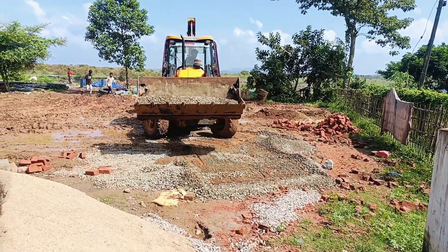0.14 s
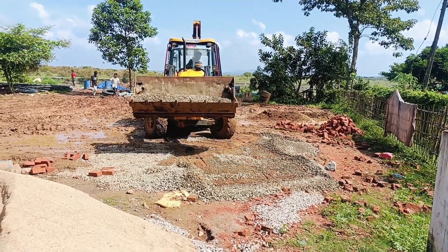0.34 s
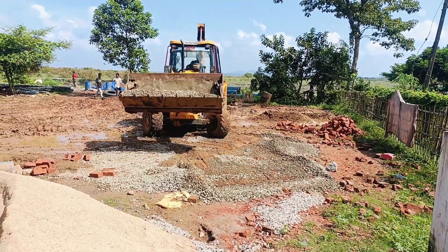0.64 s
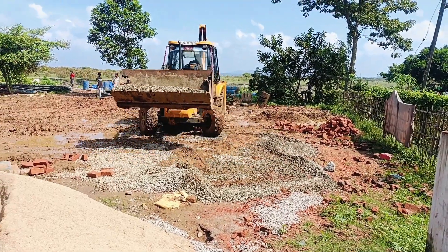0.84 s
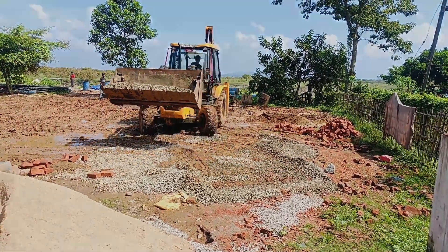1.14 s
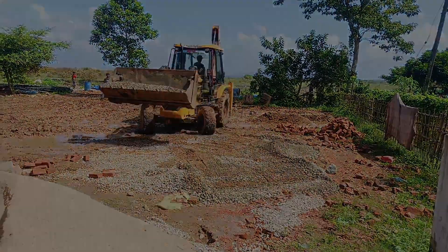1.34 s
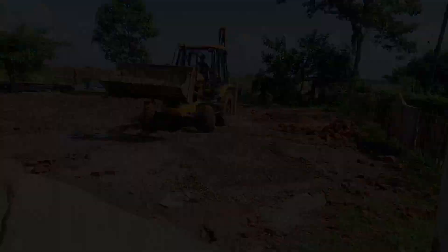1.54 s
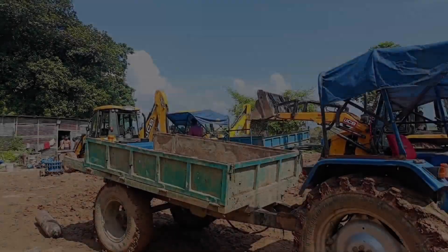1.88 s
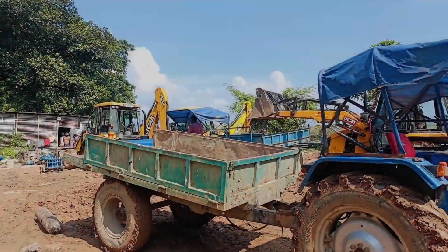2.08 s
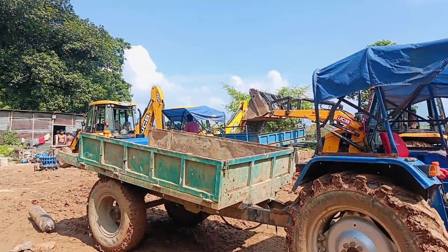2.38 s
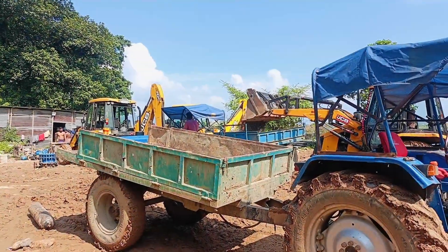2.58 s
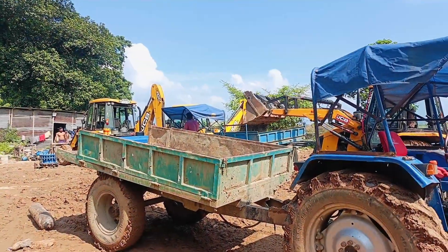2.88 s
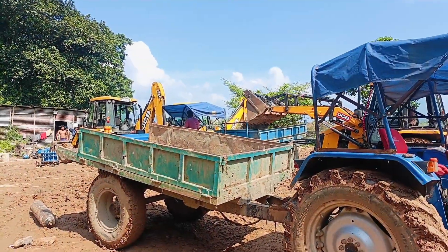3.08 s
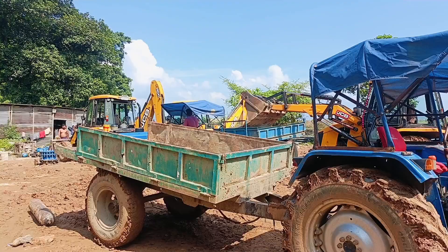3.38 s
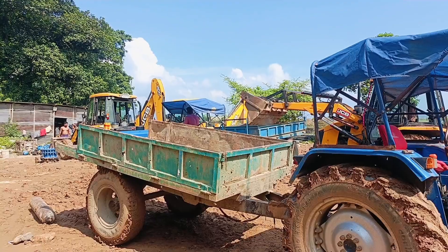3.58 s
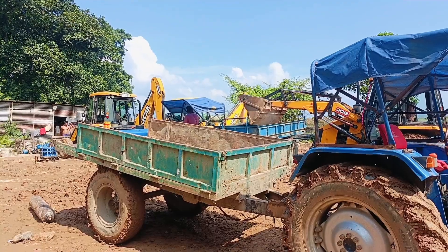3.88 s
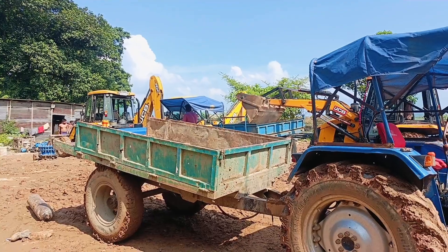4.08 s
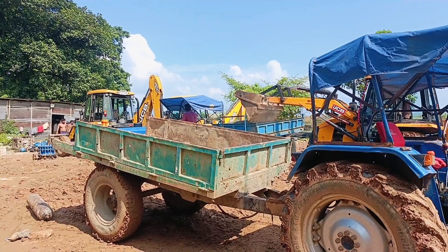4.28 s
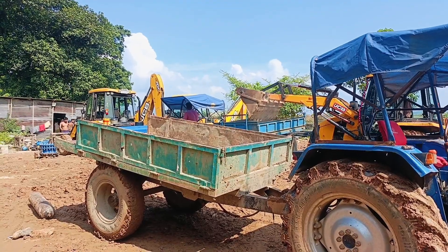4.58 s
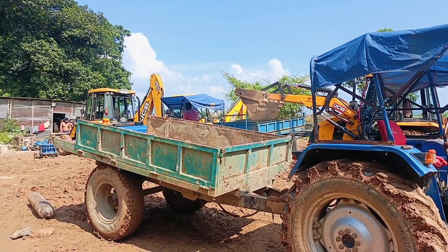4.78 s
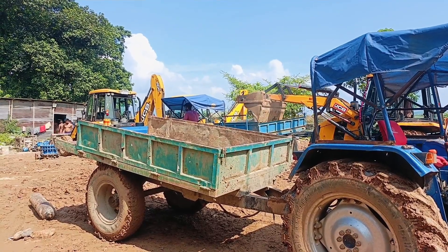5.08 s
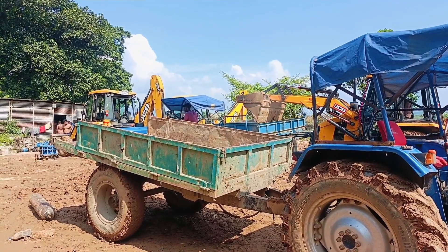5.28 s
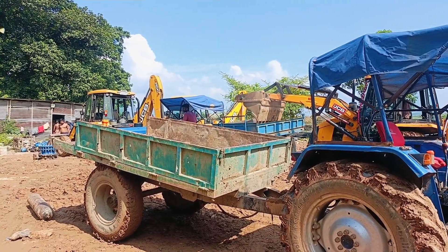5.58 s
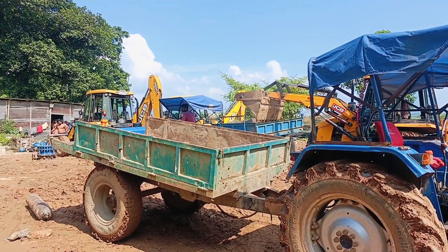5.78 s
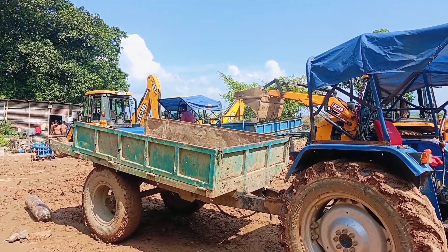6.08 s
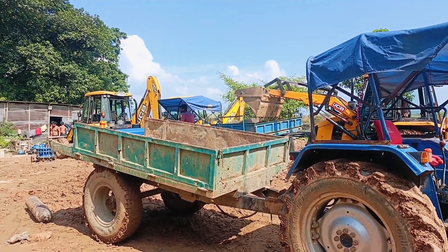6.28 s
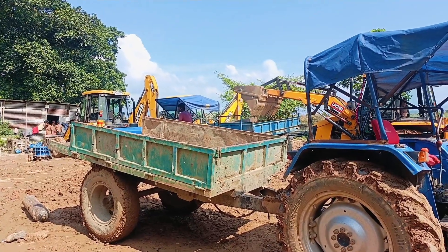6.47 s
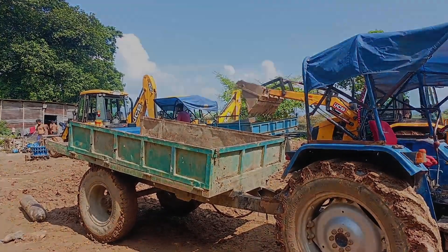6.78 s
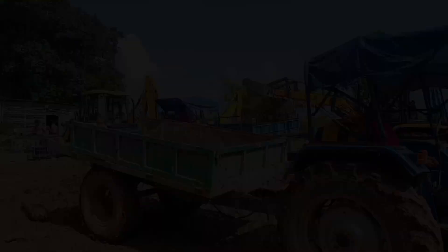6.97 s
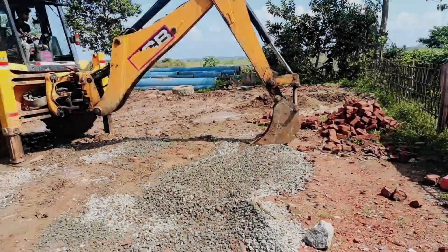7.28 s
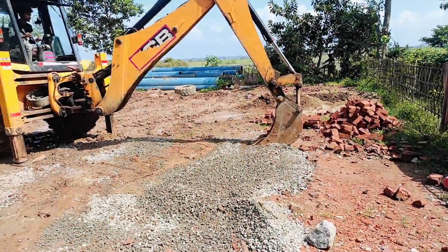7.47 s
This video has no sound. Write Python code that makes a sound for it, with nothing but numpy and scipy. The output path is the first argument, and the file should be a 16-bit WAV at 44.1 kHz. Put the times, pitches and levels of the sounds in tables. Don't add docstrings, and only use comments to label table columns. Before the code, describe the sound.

A close diesel loader growls with clanking bucket, then gravel pours into a trailer beside revving engines, silence, and a sudden metal bang.

```python
import sys
import numpy as np
from scipy import signal
from scipy.io import wavfile
from scipy.ndimage import uniform_filter1d

SR = 44100
rng = np.random.default_rng(int(sys.argv[2]) if len(sys.argv) > 2 else 0)


def how_loud(loudness_db):
    steps = np.asarray(loudness_db, float) / 20
    return 10 ** steps


def generate_wav(sig):
    pcm = np.round(np.clip(np.atleast_2d(sig).T, -1, 1) * 32767).astype(np.int16)
    wavfile.write(sys.argv[1], SR, pcm)


N = 336921


def evened(x):
    return x / np.sqrt(np.mean(x ** 2) + 1e-20)


def read(points, hz):
    f, value = np.transpose(points)
    return np.interp(np.log(hz + 1), np.log(f + 1), value)


# start in seconds, end in seconds.
SHOT_TIMES = [
    (0, 1.652),
    (1.643, 7.0385),
    (7.5717, 7.64),
]


def played(rows, shot):
    s, *columns = np.transpose(rows)
    start_s, end_s = SHOT_TIMES[shot]
    t = np.arange(round(start_s * SR), min(round(end_s * SR), N)) / SR
    return [np.interp(t, s, c) for c in columns]


def add(mix, s, sound):
    part = mix[..., round(s * SR):][..., :sound.shape[-1]]
    part += sound[..., :part.shape[-1]]


def drift(size, hz):
    steps = rng.standard_normal(size // 64 + 400)
    slow = evened(signal.lfilter(*signal.butter(2, hz * 128 / SR), steps)[398:])
    return np.interp(np.arange(size) / 64, np.arange(len(slow)), slow)


def resonate(x, hz, width_hz):
    turn = np.exp(2j * np.pi * hz * np.arange(x.shape[-1]) / SR)
    r = np.exp(-np.pi * width_hz / SR)
    return 2 * (turn * signal.lfilter([1 - r], [1, -r], x / turn)).real


# frequency in Hz, left-right likeness (0 to 1).
LIKENESS = [
    [(60, 0.94), (290, 0.99), (640, 0.91), (1400, 0.56), (3100, 0.062), (15000, 0.24)],
    [(60, 0.99), (290, 0.97), (640, 0.83), (1400, 0.62), (3100, 0.22), (15000, 0.057)],
]
# frequency in Hz, left minus right in dB.
BALANCE = [
    [(60, 1), (150, -0.5), (380, -0.5), (950, 0), (2380, -3.5), (5980, -3), (15000, 1.5)],
    [(60, -1.5), (150, -0.5), (380, -1), (950, 1.5), (2380, -5.5), (5980, -2.0), (15000, 1)],
]
# frequency in Hz, phase by which left leads in radians.
PHASE_LEAD = [
    [(500, 0), (1890, .9), (2240, 1.3), (2670, -.1), (3790, 7.9), (6550, 10.4), (8960, 24), (14600, 37.6)],
    [(500, 0), (1030, -.7), (1640, -1.9), (2930, .7), (4130, -.9), (7240, 11.5), (9130, 17.3),
     (13000, 31.7)],
]


def ports(size, spectrum, view, patchy_db, stones=None):
    drive = rng.standard_normal((size + 1024, 2), np.float32).T * (1 if stones is None else stones)
    hz, _, (a, b) = signal.stft(drive, SR, nperseg=1024, noverlap=512)
    patches = rng.standard_normal(a.T.shape, np.float32).T
    patches = evened(uniform_filter1d(uniform_filter1d(patches, 10, 0), 5, 1))
    same = np.clip(read(LIKENESS[view], hz), -1, 1)[:, None]
    half_lean = how_loud(read(BALANCE[view], hz)[:, None] / 2)
    delay = np.exp(-1j * read(PHASE_LEAD[view], hz))[:, None]
    left = a * half_lean
    right = (same * a * delay + np.sqrt(1 - same ** 2) * b) / half_lean
    z = np.array([left, right]) * how_loud(read(spectrum, hz)[:, None] + patchy_db * patches)
    return evened(signal.istft(z, SR, nperseg=1024, noverlap=512)[1][:, 512:512 + size])


def tones(turns, orders, uneven_db, swell_hz, slip, scatter):
    total = 0
    for k, db in orders:
        level = how_loud(db + uneven_db * np.tanh(drift(len(turns), swell_hz)))
        phase = slip * drift(len(turns), 2.8) + scatter * rng.standard_normal()
        total = total + level * np.sin(2 * np.pi * k * turns + phase)
    return evened(total)


def puffs(turns, depth, fade):
    strength = how_loud(2.5 * np.clip(rng.standard_normal(1000), -1.5, 1.5))[turns.astype(int)]
    pulse = uniform_filter1d(strength * np.exp(-(turns % 1) / fade), 40)
    return evened(1 - np.clip(depth, 0, 1) + depth * pulse)


# time in seconds, firing rate in Hz, load in dB.
FAR_DRIVE = [(1.65, 56.6, 5), (1.82, 58.15, 2.5), (2.2, 63.1, 4.5), (2.55, 61.9, 3.5), (2.75, 52.75, -4),
             (3.0, 53.55, -1), (3.4, 53.47, -1), (3.68, 63.15, 1.5), (4.02, 63.04, 3.5), (4.2, 54.54, 3),
             (4.5, 50.97, 0), (5.05, 50.86, -1), (5.8, 52.7, 2), (6.1, 54.37, 1.5), (6.35, 54.4, 4),
             (6.63, 61.4, 4.5), (6.78, 61, 3.5), (7.04, 60.9, 2)]
# multiple of the firing rate, level in dB.
FAR_TONE = [(1, -1.5), (2, -2.5), (3, -0.5), (4, -2.5), (5, -1.5), (6, -14.5)]
# multiple of the firing rate, level in dB.
IDLE_TONE = [(3, -10), (4, -7.5), (5, -0.5), (6, 2.5), (7, -3.5), (8, -11), (9, -15)]
# frequency in Hz, density in dB per Hz.
YARD_EXHAUST = [(25, -32.5), (45, -30), (75, -15.5), (108, -2.5), (150, -2), (180, -3.5), (226, -7.5),
                (330, -10), (620, -20.5), (810, -47), (1360, -100)]
# frequency in Hz, density in dB per Hz.
YARD_CLATTER = [(260, -33.5), (450, -9.5), (856, -3), (1020, -7), (1360, -6.5), (2100, -4), (4700, -18),
                (6630, -21.5), (9200, -31.5), (11300, -39), (13800, -46), (14800, -33.5), (16000, -44.5)]


def yard_engines():
    far_hz, load_db = played(FAR_DRIVE, 1)
    size = len(far_hz)
    idle_hz = 26.02 + 0.41 * drift(size, 2.05)
    far, idle = np.cumsum(far_hz) / SR, np.cumsum(idle_hz) / SR
    far_tone = how_loud(-41.5 + load_db) * tones(far, FAR_TONE, 5, 8, .6, 2)
    idle_tone = how_loud(-35) * tones(idle, IDLE_TONE, 5, 8, .6, 2)
    rumble = ports(size, YARD_EXHAUST, 1, 2.3) * puffs(idle, 0.22, 0.39)
    block = ports(size, YARD_CLATTER, 1, 2.5) * puffs(far, 0.26, 0.58)
    noise = how_loud(-34.5 + load_db) * rumble + how_loud(-36.5 + 0.81 * load_db) * block
    return far_tone + idle_tone + noise


def sand(t):
    spectrum = [(7500, -13.5), (9500, 7.5), (13000, -6.5), (13900, -13.5), (14600, 0.5), (16000, -5.5)]
    hold_s, thin_db_per_s = 3.15, 9.5
    return how_loud(-45 - thin_db_per_s * np.maximum(t - hold_s, 0)) * ports(len(t), spectrum, 1, 1.3)


# time in seconds, flow in dB.
GRAVEL_FLOW = [(1.65, -20.5), (2.45, -19.5), (2.85, -22.5), (3.05, -27.5), (3.8, -34), (4.15, -29),
               (4.5, -37.5), (5.45, -50), (6.31, -40)]
# frequency in Hz, density in dB per Hz.
GRAVEL_COLOUR = [(180, -14.5), (300, -2), (574, -11), (774, -4), (1480, -8), (1870, -6.5), (2440, -9.5),
                 (2790, -4.5), (4910, -11.5), (6410, -6), (9090, -18.5), (11900, -36.5), (13800, -38.5),
                 (14600, -35), (16000, -36)]
# frequency in Hz, width in Hz, level in dB.
BED_PLATES = [(2800, 300, -21), (1870, 150, -20), (7200, 300, -19)]


def gravel(t):
    size, stones_per_s, rattle_s, stop_s = len(t), 2500, 0.0017, 6.45
    hits = how_loud(4.0 * np.minimum(rng.exponential(1, size + 1024), 5))
    hits = hits * (rng.random(size + 1024) < stones_per_s / SR)
    stones = 1.7 + evened(signal.lfilter([1], [1, -np.exp(-1 / (rattle_s * SR))], hits))
    stream = ports(size, GRAVEL_COLOUR, 1, 1.1, stones) * how_loud(.7 * drift(size, 20))
    stream += sum(how_loud(db + 4.3 * drift(size, 4.9)) * evened(resonate(stream, hz, width))
                  for hz, width, db in BED_PLATES)
    flow_db, = played(GRAVEL_FLOW, 1)
    return how_loud(flow_db - 30 * np.clip(t - stop_s, 0, .3)) * stream


# frequency in Hz, width in Hz, level in dB.
BUCKET_PLATES = [(1430, 41, 2), (1760, 24, 5), (2120, 38, -5), (2660, 74, -6), (2780, 87, 0), (2960, 69, 1),
                 (3230, 66, 2), (3580, 27, 2.5), (3700, 40, -18)]


def scrape():
    top_s, rise_s, fall_s = 6.7, 0.058, 0.11
    late = SHOT_TIMES[1][1] - 1 + np.arange(SR) / SR - top_s
    level_db = -32.5 - (late / np.where(late < 0, rise_s, fall_s)) ** 2
    rub = ports(SR, [(600, -25), (1500, 0), (3800, 0), (4600, -25), (7000, -80)], 1, 1.5)
    plates = sum(how_loud(db) * resonate(rub, hz, .4 * width) for hz, width, db in BUCKET_PLATES)
    shell_hz, shell_width_hz = 320, 105
    groan = resonate(rng.standard_normal(SR), shell_hz, shell_width_hz)
    groan = how_loud(-7) * evened(resonate(groan, shell_hz, shell_width_hz))
    return how_loud(level_db) * (evened(evened(plates) + .7 * rub) + groan)


def yard():
    mix = yard_engines()
    t = SHOT_TIMES[1][0] + np.arange(mix.shape[1]) / SR
    mix = mix + sand(t) + gravel(t)
    mix[:, -SR:] += scrape()
    return mix


# frequency in Hz, density in dB per Hz.
CLOSE_EXHAUST = [(24, -45), (40, -33), (130, -4), (253, -2), (445, -6), (547, -46), (620, -26), (810, -58)]
# frequency in Hz, density in dB per Hz.
CLOSE_CLATTER = [(350, -48), (600, -22), (727, -2.5), (1370, -21), (1880, -14), (2040, -18), (2500, -9.5),
                 (4110, -25), (5790, -20), (16000, -52)]
# frequency in Hz, level in dB, time to fall 60 dB in seconds.
BANG_PLATES = [(137, -16, 0.12), (244, -12, 0.6), (330, -14, 0.081), (441.4, -16, 0.31), (716, -5.5, 0.058),
               (1570, -18.5, 0.16), (1855, -18, 0.15), (2100, -23, 0.17), (2480, -21.5, 0.089)]


def digger():
    t = np.arange(N - round(SHOT_TIMES[2][0] * SR)) / SR
    jolt_db, jolt_s = 8, 0.019
    jolt = how_loud(jolt_db * np.exp(-(t / jolt_s) ** 2))
    ring = sum(how_loud(db - 60 * t / t60) * np.sin(2 * np.pi * (hz * t + rng.random())) for hz, db, t60 in BANG_PLATES)
    rumble = how_loud(-24) * ports(len(t), CLOSE_EXHAUST, 0, 1.5)
    block = how_loud(-27.5) * ports(len(t), CLOSE_CLATTER, 0, 1.5)
    return jolt * (rumble + block) + how_loud(-21) * evened(ring) * np.minimum(t / .006, 1)


# start in seconds, level in dB, frequency in Hz.
HOLLOW_THUDS = [(1.251, -12, 126.6), (1.481, -21, 320), (1.529, -15, 130.6), (1.55, -22, 228),
                (1.57, -18, 174), (2.05, -15.5, 174), (3.6, -31, 340), (4.2, -19.5, 145.4),
                (5.035, -23, 150.7), (5.22, -25, 334), (6.365, -17, 342), (6.385, -19.5, 185),
                (6.219, -24, 142.2), (6.25, -27, 530), (6.41, -33, 151), (6.484, -28, 138),
                (6.511, -33.5, 293), (6.535, -26, 165), (6.6, -22, 330), (6.665, -22.5, 344),
                (6.701, -20, 300), (6.74, -25, 352), (6.675, -24, 175), (6.715, -28, 148),
                (6.775, -23.5, 302), (6.82, -28, 159.6), (6.876, -25, 135), (6.915, -23, 147)]
# start in seconds, level in dB, frequency in Hz.
STONE_PINGS = [(3.967, -25, 7080), (3.991, -21.5, 6840), (4.072, -22, 7300), (4.127, -17, 6900),
               (4.4227, -28, 6700), (4.7563, -35, 6640), (4.83, -35, 9540), (4.943, -42, 5780),
               (5.93, -29, 5760), (7.572, -17, 5760)]
# start in seconds, level in dB, frequency in Hz, cycles until 60 dB down.
BUCKET_BANG = [
    (7.577, -7.5, 160, 16.5),
    (7.572, -24, 2960, 86),
]


def thuds():
    out, t = np.zeros(N), np.arange(12000) / SR
    thud_cycles, ping_cycles = 48, 210
    hollow = [row + (thud_cycles,) for row in HOLLOW_THUDS]
    bright = [row + (ping_cycles,) for row in STONE_PINGS]
    for s, db, hz, cycles in hollow + bright + BUCKET_BANG:
        rise = 1 - np.exp(-t * hz / 1.2)
        add(out, s, how_loud(db - 60 * t * hz / cycles) * rise * np.sin(2 * np.pi * hz * t))
    return out


# start in seconds, level in dB.
GRIT_SNAPS = [(.211, -36), (1.6475, -25), (4.126, -36), (4.64, -42), (4.8297, -32), (5.12, -42),
              (5.617, -42), (6.142, -42), (6.348, -42)]


def ticks():
    out, t, fade_s = np.zeros(N), np.arange(300) / SR, .0007
    for s, db in GRIT_SNAPS:
        snap = signal.lfilter([.5], [1, -.5], rng.standard_normal(300))
        add(out, s, how_loud(db) * np.exp(-t / fade_s) * snap)
    return out


# frequency in Hz, density in dB per Hz.
CHIP_COLOUR = [
    [(2240, -37.5), (3800, -7.5), (4700, -14.5), (5600, -6), (6700, -8), (8360, -26), (9200, -19.5),
     (15100, -62), (16000, -44)],
    [(2240, -27), (3800, -3), (5040, -5), (6530, -1), (7920, -10.5), (9480, -17), (11500, -35),
     (16000, -36.5)],
]
# start in seconds, blow in dB, ring in Hz.
LINKAGE_KNOCKS = [(0.3349, -8, 2010), (0.4879, -17.5, 1930), (0.514, -27, 2030), (.5571, -35, 2130),
                  (.2857, -40.5, 1900), (0.467, -38, 2090), (.7467, -27.5, 2110), (.7695, -10.5, 2172),
                  (.9203, -11.5, 2070), (1.0783, -15, 1830), (1.183, -9.5, 1940), (1.2613, -15.5, 1835),
                  (1.338, -41, 1870), (1.4424, -11, 2020), (1.587, -11.5, 2070)]
# start in seconds, blow in dB, ring in Hz, bright part in dB re blow.
STEEL_STRIKES = [(0.2111, -17, 1900, -11), (0.6496, -17, 1940, -11), (1.634, -12, 1540, -8),
                 (2.83, -26, 3090, 9), (2.6782, -10.5, 2810, -3), (3.4926, -30, 2030, -6),
                 (4.4321, -33, 2980, 1), (5.7111, -36, 2330, -10), (6.0149, -24, 2110, -10),
                 (3.9684, -29, 1856, 2), (3.991, -21, 2780, -5), (4.0708, -23, 2894, -6),
                 (4.125, -11.5, 2966, -2), (4.4247, -21.5, 2100, 0.5), (4.455, -28, 3000, -11),
                 (4.64, -24, 3480, -5), (4.6667, -18, 1852, -4), (4.7552, -31, 2110, 7),
                 (4.8296, -24, 2100, -5), (4.9425, -32, 2060, 1), (5.033, -30.5, 2288, 1.5),
                 (5.1202, -31, 1668, -3), (5.311, -28, 1920, 0.5), (5.6167, -22.5, 1940, -8),
                 (5.7744, -35.5, 2717, 10), (5.9285, -34, 3040, 6), (6.1423, -22.5, 3130, -1),
                 (6.241, -23.5, 2640, -0.5), (6.3481, -16, 2780, 1.5), (7.57, -21.5, 1870, 3)]
# start in seconds, blow in dB, ring in Hz, bright part in dB, length in seconds.
LONG_RATTLES = [(1.046, -22, 1980, -16, .004), (1.056, -16, 1810, -14, .004), (1.069, -14, 1850, -15, .006),
                (1.088, -46, 1900, -14, .004), (1.308, -19, 1950, -11, .004),
                (1.317, -15.5, 1810, -11, .004), (1.328, -12, 1824, -12, .004),
                (1.343, -11.5, 1900, -21, 0.0027), (2.312, -17, 2720, -3, 0.032),
                (2.38, -15, 1804, -3, 0.033), (3.251, -16.5, 1312, -5, 0.042),
                (4.135, -14, 1924, -19, 0.016), (4.196, -17, 1990, -7, 0.016),
                (5.796, -25, 2930, -4.5, 0.04), (6.26, -27, 1800, -9, 0.034)]
# multiple of the ring, level in dB.
LINK_RING = [(1, 1), (1.1, -4), (1.47, -0.5), (1.7, -10.5), (2.06, -9)]


def clanks():
    cut = round(SHOT_TIMES[0][1] * SR)
    body = ports(N, [(400, -12.0), (1500, -1.5), (3800, -2.5), (4600, -33.5), (7000, -79.5)], 0, 1.4)
    chip = np.hstack([ports(cut, CHIP_COLOUR[0], 0, 0.72), ports(N - cut, CHIP_COLOUR[1], 1, 0.78)])
    blows_per_s, blow_s = 1100, 0.0027
    blows = rng.exponential(1, N) * (rng.random(N) < blows_per_s / SR)
    cluster = 0.81 + 0.49 * evened(signal.lfilter([1], [1, -np.exp(-1 / (blow_s * SR))], blows))
    out, t = np.zeros((2, N)), np.arange(4500) / SR
    knocks = [row + (-20.5,) for row in LINKAGE_KNOCKS]
    for s, db, hz, bright_db, *length in knocks + STEEL_STRIKES + LONG_RATTLES:
        at = slice(round(s * SR), round(s * SR) + len(t))
        length_s = sum(length)
        now = t[:body[:, at].shape[1]]
        late = np.maximum(now - .002 - length_s, 0)
        rise = np.minimum(now / (0.001 + 0.31 * length_s), 1)
        struck = np.sin(2 * np.pi * hz * now) + 0.53 * np.sin(2 * np.pi * 0.91 * hz * now)
        if length:
            t60, body_share = 0.16, .22
            rise = rise * cluster[at]
            link = evened(sum(how_loud(mode_db) * resonate(body[:, at], k * hz, 50) for k, mode_db in LINK_RING))
            ring = .6 * struck + 0.61 * link
        else:
            t60, body_share = 0.13, .4
            rise = rise * how_loud(4.5 * np.exp(-now / 0.00506))
            ring = 0.88 * struck
        dull = (0.63 * ring + body_share * body[:, at]) * how_loud(-60 * late / t60)
        bright = how_loud(bright_db) * chip[:, at] * how_loud(-60 * late / (0.87 * t60))
        add(out, s, how_loud(db - 9.0) * rise * (dull + bright))
    return out


# time in seconds, shaft speed in Hz, load in dB.
NEAR_DRIVE = [(0, 36.5, -0.5), (.15, 37.88, -3), (.55, 38.93, 1), (.8, 39.81, 4), (.92, 40.45, 2),
              (1.05, 40.79, -1.5), (1.38, 42.35, -1.5), (1.5, 43, 1), (1.65, 42.82, 5.5)]
# multiple of the shaft speed, level in dB.
NEAR_TONE = [(.5, -30.5), (1, -9.5), (2, 6), (2.5, -19), (3, 6), (3.5, -8.5), (4, -0.5), (4.5, -23.5),
             (5, -10), (5.5, -12), (6, -11.5), (6.5, -14.5), (7, -14), (7.5, -16), (8, -16.5)]
# frequency in Hz, density in dB per Hz.
NEAR_EXHAUST = [(25, -29), (40, -29.5), (65, -21), (100, -6.5), (145, -0.5), (230, -4), (312, -8),
                (400, -7), (490, -8.5), (620, -27.5), (810, -52.5)]
# frequency in Hz, density in dB per Hz.
NEAR_CLATTER = [(350, -32), (600, -13), (758, -0.5), (984, -2), (1430, -13), (1900, -6), (2340, -11),
                (3480, -17.5), (4710, -27.5), (5870, -21), (8500, -37.5), (13800, -59.5), (14700, -53.5),
                (16000, -59)]
FIRING_DB = [1.5, 0, 1.5, -0.5]


def near_loader():
    hz, load_db = played(NEAR_DRIVE, 0)
    turns = np.cumsum(hz) / SR + 0.1
    rumble = ports(len(hz), NEAR_EXHAUST, 0, 1.5) * puffs(turns + 0.12, 0.5, 0.4)
    block = ports(len(hz), NEAR_CLATTER, 0, 2.1) * puffs(turns + 0.048, 0.31, 0.5)
    shift_db = 2.14 * np.maximum(hz - 40.4, 0)
    pipe = [(k, db + shift_db * ((k == 4) - (k == 3))) for k, db in NEAR_TONE]
    orders = -how_loud(-25.5 + load_db) * tones(turns, pipe, 1.2, 5, .2, .15)
    firing_db = np.take(FIRING_DB, np.round(turns).astype(int), mode="wrap")
    firing = how_loud(uniform_filter1d(firing_db, size=300))
    noise = how_loud(0.34 * load_db) * (how_loud(-24) * firing * rumble + how_loud(-29) * block)
    return firing * orders + noise


def scene():
    mix = clanks() + thuds() + ticks()
    mix[:, round(SHOT_TIMES[1][1] * SR):round(SHOT_TIMES[2][0] * SR)] = 0
    first, second = near_loader(), yard()
    overlap = round((SHOT_TIMES[0][1] - SHOT_TIMES[1][0]) * SR)
    first[:, -overlap:] *= np.linspace(1, .5, overlap)
    second[:, :overlap] *= .25
    for (s, _), sound in zip(SHOT_TIMES, (first, second, digger())):
        add(mix, s, sound)
    return mix


def top_cut(x):
    return signal.sosfilt(signal.butter(12, 16880, fs=SR, output="sos"), x)


# frequency in Hz, share of nearby power under which treble is dropped.
TREBLE_MASK = [(4000, .05), (6500, .1), (7500, .2), (9000, .55), (10000, 1.1), (11000, 1.5), (14000, 1.6),
               (15000, 1.2)]


def record(dry):
    edge_hz = 15800
    hz, _, z = signal.stft(dry, SR, nperseg=2048, noverlap=1024)
    power = abs(z.mean(0)) ** 2 + .3 * abs(z[0] - z[1]) ** 2
    power = uniform_filter1d(power, size=3, axis=0)
    treble = power[(hz > 10000) & (hz < edge_hz)].sum(0)
    calm = treble < 2.6 * np.roll(treble, 2)
    masked = power < uniform_filter1d(power, size=40, axis=0) * read(TREBLE_MASK, hz)[:, None]
    lost = calm & masked | (hz > edge_hz)[:, None]
    kept = dry - signal.istft(z * lost, SR, nperseg=2048, noverlap=1024)[1][:, :N]
    t = np.arange(N) / SR
    kept *= np.clip(np.maximum(SHOT_TIMES[1][1] - t, t - SHOT_TIMES[2][0]) / .001, 0, 1)
    return top_cut(kept)


dry = scene()
out = record(dry)
generate_wav(out)
```